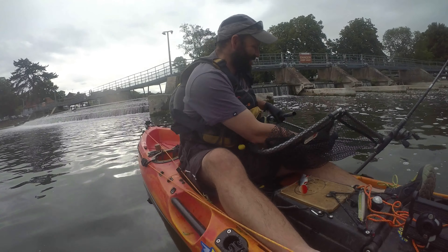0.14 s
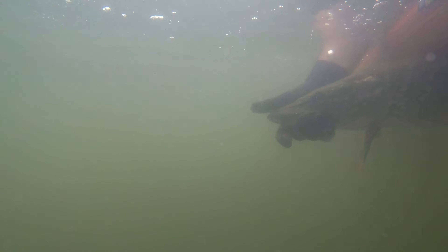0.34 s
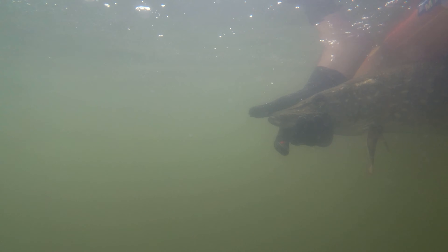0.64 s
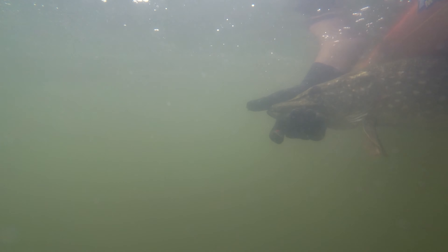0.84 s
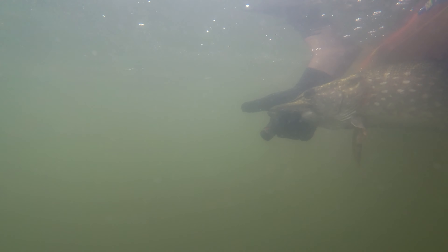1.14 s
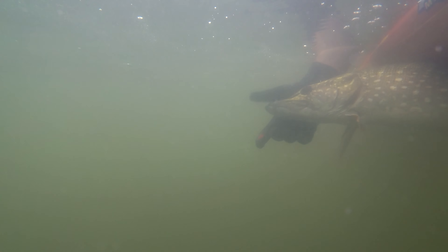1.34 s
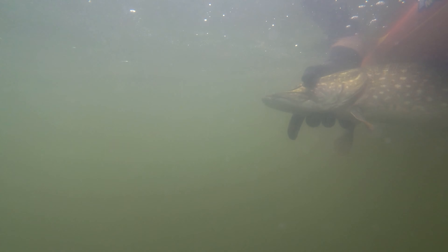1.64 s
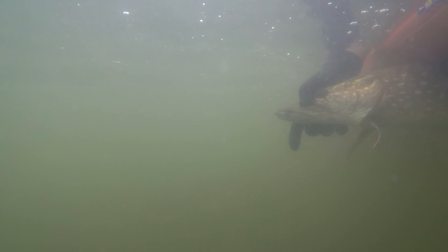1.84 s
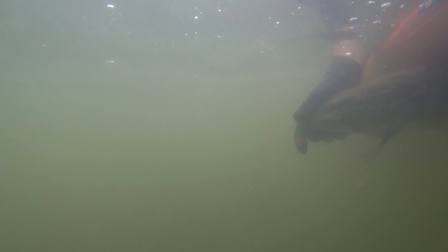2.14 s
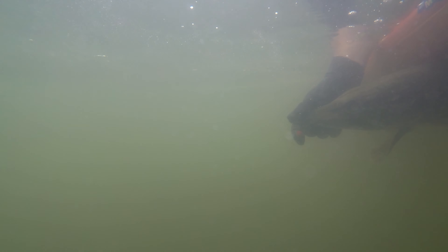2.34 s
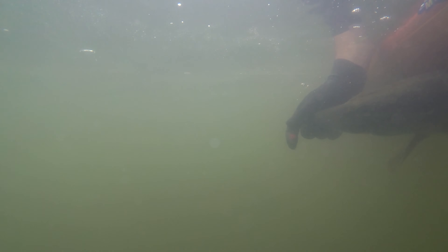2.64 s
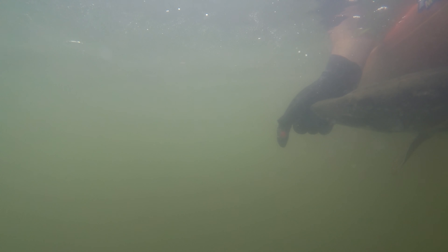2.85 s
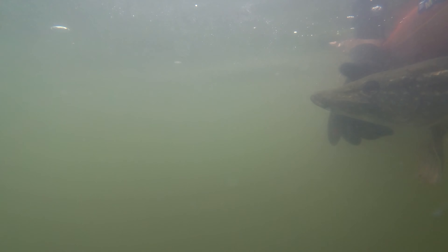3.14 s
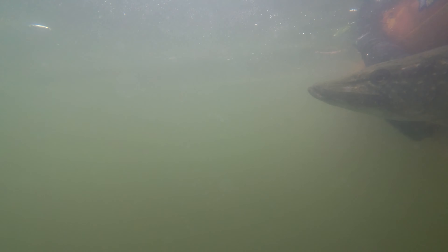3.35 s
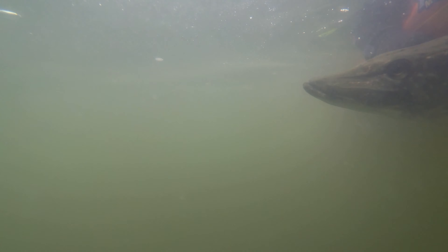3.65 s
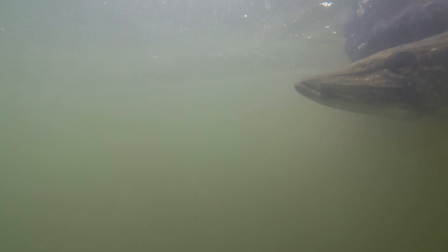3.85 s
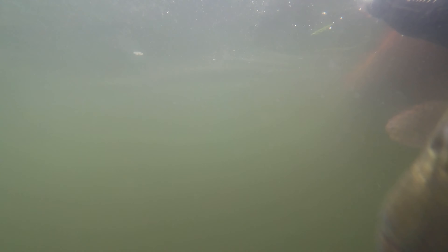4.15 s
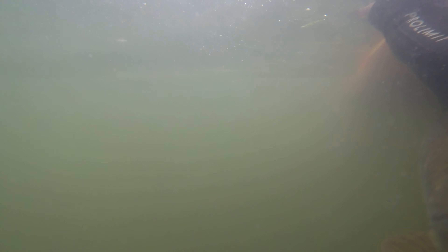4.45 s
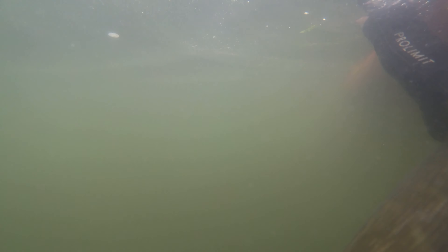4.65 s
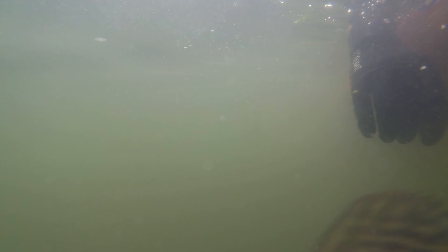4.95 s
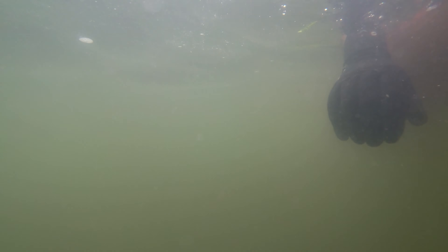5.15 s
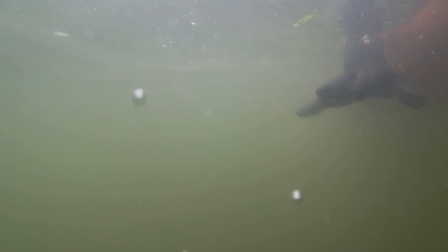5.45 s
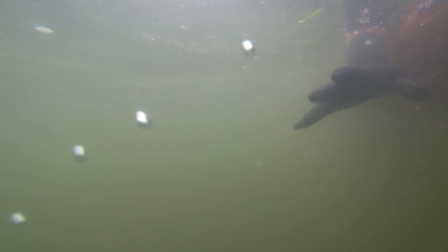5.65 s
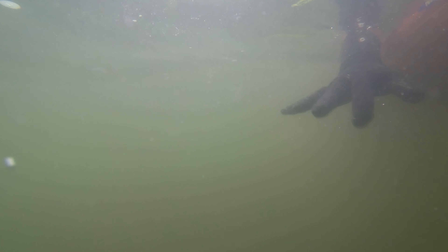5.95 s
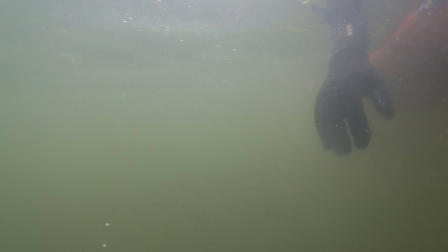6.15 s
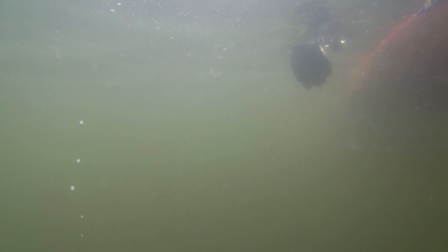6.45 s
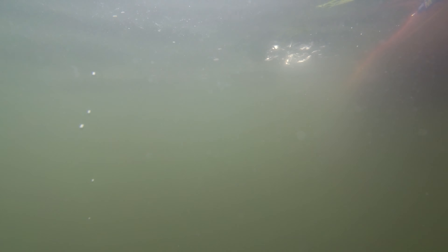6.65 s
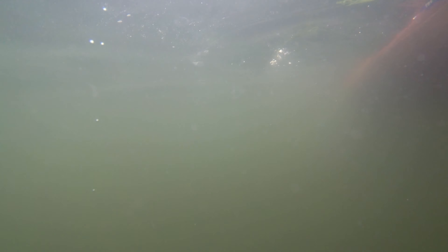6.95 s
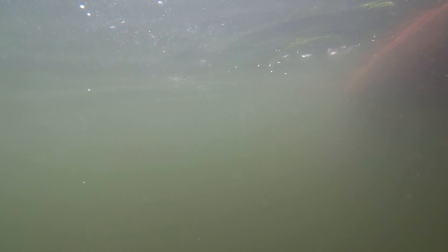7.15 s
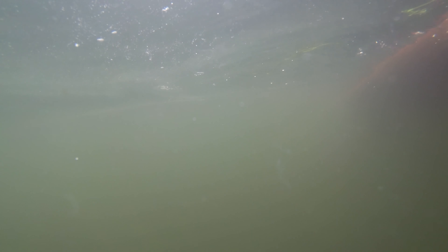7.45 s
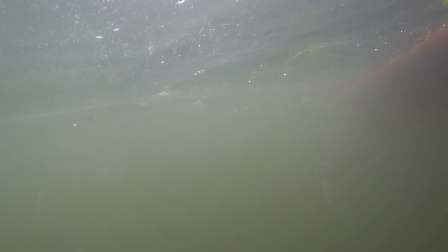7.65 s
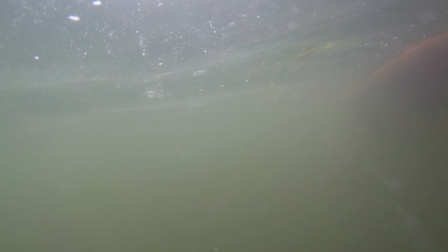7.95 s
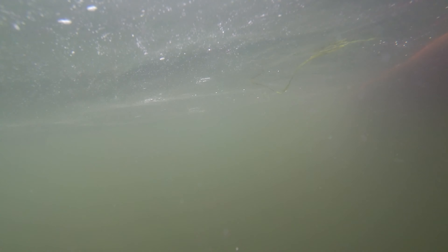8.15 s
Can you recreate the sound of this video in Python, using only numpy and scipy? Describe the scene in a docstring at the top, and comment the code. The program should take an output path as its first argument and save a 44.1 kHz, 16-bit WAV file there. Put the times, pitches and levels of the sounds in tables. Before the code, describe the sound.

Beside a kayak, falling water at a weir roars in open air for a third of a second, then cuts to a submerged, muffled rumble and hollow hum. Deep thumps come irregularly, with bubbles and gulps. A pike's release brings hard, overloaded knocks in the middle, then a loud gulp, sloshing and fewer thuds. The microphone is sealed in a waterproof housing.

```python
"""Pike let go below a weir

From a kayak on the river: the weir through the air for a moment, then the camera's waterproof housing is under.
Shaped noise makes the roar of the weir, and narrow resonances of noise make its hum in the housing.
At the housing, strokes of fin and hand set off decaying tones: deep thumps, dull knocks, gulps and bubbles.
Stirred water is low noise with a swarm of small rings; drops and grit tick.
The hardest blows overload the microphone and are cut flat; a faint thin high buzz follows the low swings."""
import sys
import numpy as np
from scipy import signal
from scipy.fft import rfft, irfft
from scipy.io import wavfile
from scipy.ndimage import uniform_filter1d

SR = 44100
rng = np.random.default_rng(int(sys.argv[2]) if len(sys.argv) > 2 else 0)


def file_out(sig):
    """Save sig as 16-bit WAV at sys.argv[1]."""
    # one column per channel
    cols = np.atleast_2d(sig).T
    # limit, then scale
    lim = np.clip(cols, -1, 1)
    pcm = np.round(lim * 32767).astype(np.int16)
    wavfile.write(sys.argv[1], SR, pcm)


N = 365456
TIME = np.arange(N) / SR  # s

# spectrum of the weir through the air: f/Hz, relative density/dB
AIR = [(15, -72), (25, -22), (64, -6), (103, 1.5), (146, -8.5), (243, -5.5), (373, -5), (427, -7),
       (501, -5), (749, -10), (3010, -31.5), (4040, -28.5), (8100, -51.5), (9270, -40.5), (15000, -77)]
# resonances of the microphone port in air: f/Hz, filter width/Hz, rms level/dB
PORT = [(3970, 410, -48), (9200, 800, -67)]
# spectrum of the weir's rumble through the housing: f/Hz, relative density/dB
RIVER = [(15, -16), (30, -6), (62, -1.5), (95, -6.5), (220, -11.5), (330, -8.5), (450, -6.5), (560, -9),
         (680, -14.5), (770, -24.5), (1070, -25), (1170, -44), (1880, -49), (2150, -78)]
# spectrum of the faint hiss under water: f/Hz, relative density/dB
HISS = [(1000, 0.5), (2200, -3), (3000, -8), (4600, -4), (8000, -9), (12300, -14), (13000, -30)]
# air resonances of the housing: f/Hz, filter width/Hz, relative level/dB
HOUSING = [(510, 42, -34.5), (551, 29, -37), (665.1, 28, -46.5), (1044.6, 47, -56), (1286, 60, -70.5)]
# strength of the current, lifting hum and rumble together: t/s, gain/dB
CURRENT = [(0.3, -0.5), (2.0, -0.55), (3.6, -0.7), (4.3, 0), (6.4, 0), (7.1, 2), (8.29, 2.66)]
# small sharp ticks of drops and grit on the housing:
# t/s, ring level/dB, f/Hz, ring t60/s, click level before it is rounded off/dB
TICKS = [(1.358, -56, 1865, 0.055, -60.5), (4.596, -67, 4750, 0.013, -44), (4.835, -19, 1057, 0.051, -31),
         (4.836, -24.5, 1625, 0.011, -41), (4.991, -54, 4700, .015, -69), (5.364, -37, 1020, 0.02, -32),
         (6.212, -57.5, 4700, 0.014, -37), (6.291, -26, 970, 0.018, -22), (7.36, -29, 1267, 0.048, -58),
         (8.167, -46, 1750, .02, -49.5)]
# strokes of fish and hand that stir the water: start t/s, hold/s, slosh level/dB, bubbling level/dB
STIRS = [(1.322, 0.24, -30.5, -33), (3.54, 0.034, -30.5, -29.5), (3.981, 0.39, -32, -35.5),
         (4.317, 0.036, -17.5, -29.5), (4.704, 0.29, -26.5, -49.5), (5.33, 0.017, -27, -25.5),
         (6.713, 0.37, -18.5, -36), (7.05, 0.05, -17, -28.5), (7.2, 0.29, -27, -34.5)]
# spectrum of low eddies sloshing on the housing: f/Hz, relative density/dB
SLOSH = [(15, -15.5), (35, -5.5), (62, 9.5), (90, -7), (145, -10), (178, -7.5), (205, -14),
         (320, -23), (600, -44), (1500, -87.5)]
# single bubbles that ring as they close: t/s, level before dulling/dB, starting f/Hz, t60/s
BUBBLES = [(0.453, -17.5, 505, 0.034), (0.489, -19, 479, 0.29), (0.572, -15, 520, 0.036),
           (0.622, -27.5, 890, 0.031), (1.39, -15.5, 606, 0.021), (1.423, -22.5, 833, 0.032),
           (1.424, -37.5, 1053, 0.39), (1.492, -11, 552, 0.2), (1.566, -15.5, 623, 0.021),
           (1.569, -27, 921, 0.089), (1.596, -17, 669, 0.063), (1.783, -18.5, 623, 0.13),
           (3.362, -34.5, 1040, 0.05), (4.018, -20.5, 608, 0.078), (4.05, -16.5, 564, 0.066),
           (4.086, -16, 525, 0.084), (4.213, -19.5, 516, 0.16), (4.594, -15.5, 547, 0.027),
           (4.83, -12.5, 490, 0.042), (5.355, -12, 620, 0.011), (5.36, -2.5, 497, 0.097),
           (5.385, -12.5, 546, 0.15), (6.291, -10.5, 586, 0.018), (6.72, -13.5, 567, 0.071),
           (6.86, -12.5, 610, 0.072), (7.335, -26, 1051, 0.25), (7.359, -20.5, 767, 0.03),
           (7.359, -22.5, 562, 0.14), (7.41, -27, 821, 0.09), (7.555, -16.5, 425, 0.064)]
# big gulps of air: t/s, level before dulling/dB, starting f/Hz, t60/s
GULPS = [(1.335, -16.5, 427, 0.24), (1.397, -15.5, 343, 0.43), (5.357, -5, 374, 0.14)]
# dull knocks of water on the hull and housing: t/s, level of the main ring/dB, starting f/Hz, t60/s
KNOCKS = [(1.332, -19, 214, 0.05), (3.5816, -0.5, 240.3, 0.065), (3.603, -8.5, 172, 0.084),
          (3.822, -11, 103.5, 0.12), (4.264, -7, 256, 0.067), (4.379, -2, 245.3, 0.056),
          (4.414, -11.5, 361, 0.054), (4.669, -22, 128, 0.085), (4.91, -9, 256.3, 0.075),
          (5.314, -6.5, 254, 0.04), (5.318, -8.5, 112.4, 0.056), (6.717, -14.5, 193, 0.078),
          (7.011, -17, 192, 0.23), (7.104, -6.5, 354, 0.012), (7.161, -18, 256, 0.03)]
# pressure surges: t/s, level before overload/dB, f/Hz, rise/s, t60/s
THUMPS = [(0.455, -20.5, 50.7, 0.012, 0.33), (0.66, -3, 53.8, 0.029, 0.21), (1.02, 3, 53.7, 0.018, 0.23),
          (1.227, -2, 54.7, 0.03, 0.2), (1.555, -14.5, 45, 0.046, 0.18), (1.804, -7.5, 52.5, 0.036, 0.22),
          (2.108, -15, 44.3, 0.048, 0.18), (3.045, -13.5, 47.7, 0.014, 0.24), (3.352, 0, 51.3, 0.027, 0.23),
          (3.518, -12.5, 55, 0.019, 0.39), (3.599, 4, 47.2, 0.017, 0.13), (3.684, -18, 56.8, 0.046, 0.4),
          (3.829, -0.4, 50.8, 0.037, 0.22), (3.981, -14, 57.5, 0.025, 0.23), (4.092, -14, 50.5, 0.029, 0.5),
          (4.407, 3, 51.06, 0.015, 0.25), (4.668, -4.5, 52, 0.013, 0.11), (4.939, -2.5, 51.5, 0.03, 0.09),
          (5.022, -10.5, 53.7, 0.018, 0.14), (5.118, -1.5, 50.8, 0.015, 0.13),
          (5.297, -6, 45, 0.025, 0.093), (5.583, -5, 50.5, 0.016, 0.26), (5.744, -16.5, 44, 0.035, 0.15),
          (6.061, -14, 47, 0.024, 0.15), (6.192, -22, 48.3, 0.038, 0.25), (6.811, -17.5, 60.5, 0.017, 0.21),
          (7.121, -4, 47.2, 0.02, 0.12), (7.311, -9, 52, 0.017, 0.12), (7.444, -13.5, 51, 0.014, 0.15),
          (7.916, -14.5, 58.5, 0.019, 0.17)]

DIVE_S, DIVE_FADE_S = 0.3103, 0.0018  # the camera goes under
AIR_DB = -29
# the hum swells and sinks slowly
SWELL_DB, SWELL_PERIOD_S, SWELL_CREST_S = 0.5, 1.8, 2.35
STIR_ATTACK_S, SLOSH_FALL_DB_PER_S, BUBBLING_FALL_DB_PER_S = 0.029, 109.5, 172
# a small bubble swells for a few cycles and rises a little in pitch
BUBBLE_RISE_CYCLES, BUBBLE_GLIDE_OCTAVES = 1.6, 0.05
# a big pocket of air swells for a few cycles, drops quickly in pitch and has a weak overtone
GULP_RISE_CYCLES, GULP_DROP_OCTAVES, GULP_SETTLE_S, GULP_OVERTONE_DB = 2.2, 0.94, 0.028, -14.5
AIR_POCKET_TOP_HZ = 1300  # the housing dulls gulps and bubbles above this
KNOCK_RISE_CYCLES = 2
# a surge swings the camera on its mount; the quicker the surge, the harder its first jolt
JOLT_DB, JOLT_AT_RISE_S, JOLT_DB_PER_HALVING = -14.5, 0.02, 5
BUZZ_HZ, BUZZ_DB = 3900, -61  # spacing and strength of the sample-rate conversion images
TOP_HZ = 15900  # upper limit of the recorder


def undb(db):
    """Decibels to gain."""
    return 10 ** (np.asarray(db) / 20)


def unit(x):
    """Scale to rms 1."""
    return x / np.sqrt(np.mean(x ** 2) + 1e-18)


def add(track, s, sound):
    """Mix a sound into the track at time s."""
    i = max(int(s * SR), 0)
    track[i:i + len(sound)] += sound[:max(N - i, 0)]


def colour(x, points):
    """Give a sound a spectrum of (Hz, dB) points, at rms 1."""
    hz, db = np.transpose(points)
    f = np.maximum(np.fft.rfftfreq(N, 1 / SR), 1)
    gain = undb(np.interp(np.log(f), np.log(hz), db))
    return unit(irfft(rfft(x) * gain, N))


def resonate(x, hz, width_hz):
    """A steep resonance: one band-pass applied twice."""
    b, a = signal.iirpeak(hz, hz / width_hz, fs=SR)
    return signal.lfilter(b, a, signal.lfilter(b, a, x))


def muffle(x, hz, order):
    """Low-pass."""
    return signal.sosfilt(signal.butter(order, hz, fs=SR, output="sos"), x)


def noise():
    """White noise."""
    return rng.standard_normal(N)


def walk(rate):
    """Random levels held 1 / rate s and slewed twice; spread near 1."""
    k = int(SR / rate)
    steps = np.repeat(rng.standard_normal(N // k + 1), k)
    return 1.27 * uniform_filter1d(uniform_filter1d(steps, k), k)[:N]


def ring(hz, rise, t60, glide=0, settle_s=None):
    """A resonance that swells while it is pushed, then dies away; its pitch glides by some octaves."""
    rise = max(rise, 1 / SR)
    t = np.arange(int((rise + 2 * t60) * SR)) / SR
    swell = np.sin(np.pi / 2 * np.minimum(t / rise, 1)) ** 2
    fade = np.exp(-np.log(1000) * np.maximum(t - rise, 0) / t60)
    pitch = hz * 2 ** (glide * np.tanh(t / (settle_s or t60 / 2)))
    return swell * fade * np.sin(2 * np.pi * np.cumsum(pitch) / SR)


def weir_in_air():
    """Falling water roars as broad noise, with narrow resonances of the microphone port on top."""
    port = sum(undb(db) * unit(resonate(noise(), hz, width)) for hz, width, db in PORT)
    return undb(AIR_DB) * colour(noise(), AIR) + port


def river(rumble_db=-28.5, waver_db=2.0, hiss_db=-80.5, hum_db=1.0, hum_waver_db=2):
    """The roar of the weir rumbles through the housing and keeps its air resonances humming."""
    flow_db = np.interp(TIME, *np.transpose(CURRENT))
    swell_db = SWELL_DB * np.cos(2 * np.pi * (TIME - SWELL_CREST_S) / SWELL_PERIOD_S)
    rumble = colour(noise(), RIVER) * undb(rumble_db + waver_db * walk(15))
    hum = np.zeros(N)
    for hz, width, db in HOUSING:
        waver = undb(db + hum_waver_db * walk(16))
        hum += waver * unit(resonate(noise(), hz, width))
    hum *= undb(hum_db + swell_db)
    hiss = undb(hiss_db) * colour(noise(), HISS)
    return (rumble + hum) * undb(flow_db) + hiss


def ticks():
    """Drops and grit strike the housing: a short ring and a click that the housing rounds off."""
    rings, clicks = np.zeros(N), np.zeros(N)
    for s, ring_db, hz, t60, click_db in TICKS:
        add(rings, s, undb(ring_db) * ring(hz, 0.002, t60))
        add(clicks, s, undb(click_db) * ring(920, 0.00023, 0.0033))
    return rings + muffle(clicks, 1900, order=10)


def stroke(start, hold, fall_db_per_s):
    """Gain of one stroke: it builds up, holds, then settles."""
    t = TIME - start
    build = np.clip(t / STIR_ATTACK_S, 0, 1)
    return build * undb(-fall_db_per_s * np.maximum(t - STIR_ATTACK_S - hold, 0))


def churn(count=1100, scatter_db=8, housing_db=8):
    """Stirred water: low eddies slosh on the housing and a swarm of small bubbles rings."""
    slosh_power, bubbling_power = np.zeros(N), np.zeros(N)
    for s, hold, slosh_db, bubbling_db in STIRS:
        slosh_power += (undb(slosh_db) * stroke(s, hold, SLOSH_FALL_DB_PER_S)) ** 2
        bubbling_power += (undb(bubbling_db) * stroke(s, hold, BUBBLING_FALL_DB_PER_S)) ** 2
    slosh = colour(noise(), SLOSH) * np.sqrt(slosh_power)
    swarm = np.zeros(N)
    for when, size, strength, damping in rng.random((count, 4)):
        # small bubbles (size near 1) are higher, shorter and weaker
        hz = 280 * 3.8 ** size
        t60 = (8 + 20 * damping) / hz
        level = undb(scatter_db * strength - 10 * size)
        add(swarm, when * N / SR, level * ring(hz, 0.0027, t60, glide=0.06))
    swarm = muffle(swarm, 1080, order=12)
    # the smallest bubbles wake the housing's upper resonance
    swarm = swarm + undb(housing_db) * resonate(swarm, 1055, 70)
    return slosh + unit(swarm) * np.sqrt(bubbling_power)


def bubbles():
    """Small pockets of air ring as they close, rising a little in pitch, dulled by the housing."""
    out = np.zeros(N)
    for s, db, hz, t60 in BUBBLES:
        add(out, s, undb(db) * ring(hz, BUBBLE_RISE_CYCLES / hz, t60, BUBBLE_GLIDE_OCTAVES))
    return muffle(out, AIR_POCKET_TOP_HZ, order=4)


def gulps():
    """Big pockets of air drop quickly in pitch, with a weak octave overtone, dulled by the housing."""
    out = np.zeros(N)
    for s, db, hz, t60 in GULPS:
        rise = GULP_RISE_CYCLES / hz
        for multiple, partial_db in [(1, 0.0019), (2, GULP_OVERTONE_DB)]:
            partial = ring(multiple * hz, rise, t60, -GULP_DROP_OCTAVES, GULP_SETTLE_S)
            add(out, s, undb(db + partial_db) * partial)
    return muffle(out, AIR_POCKET_TOP_HZ, order=4)


def knocks(body_db=-12, wall_db=-16, overtone_db=-14):
    """A slap rings at a sinking pitch and an overtone, over a low push and a brief answer of the housing."""
    out = np.zeros(N)
    for s, db, hz, t60 in KNOCKS:
        slap, rise = undb(db), KNOCK_RISE_CYCLES / hz
        add(out, s, slap * ring(hz, rise, t60, glide=-0.15))
        add(out, s, slap * undb(overtone_db) * ring(1.6 * hz, rise, 3.9 * t60))
        add(out, s, slap * undb(body_db) * ring(125, 2 * rise, 0.07))
        add(out, s, slap * undb(wall_db) * ring(570, rise / 2, 0.028))
    return out


def thumps(jolt_hz=102, jolt_rise=0.0045, jolt_t60=0.14):
    """Each surge rocks the camera and flexes its mount about an octave higher, harder if abrupt."""
    out = np.zeros(N)
    for s, db, hz, rise, t60 in THUMPS:
        jolt_db = db + JOLT_DB + JOLT_DB_PER_HALVING * np.log2(JOLT_AT_RISE_S / rise)
        add(out, s, undb(db) * ring(hz, rise, t60))
        add(out, s + 0.003, undb(jolt_db) * ring(jolt_hz, jolt_rise, jolt_t60))
    return out


def scene():
    """A moment in the open air, then everything under water."""
    under = np.clip((TIME - DIVE_S) / DIVE_FADE_S, 0, 1)
    water = river() + ticks() + churn() + bubbles() + gulps() + knocks() + thumps()
    return ((1 - under) * weir_in_air() + under * water)[None]


def record(dry):
    """Overload cuts the loudest swings flat; sample-rate conversion leaves a thin buzz; the top is cut off."""
    clipped = np.clip(dry, -1, 1)
    # conversion images: faint copies of the sound around each multiple of BUZZ_HZ,
    # heard as a thin high buzz that follows the loud low swings
    images = sum(undb(BUZZ_DB) / k * np.cos(2 * np.pi * k * BUZZ_HZ * TIME) for k in range(1, 5))
    top_cut = signal.ellip(8, 0.2, 70, TOP_HZ, fs=SR, output="sos")
    return signal.sosfilt(top_cut, clipped * (1 + images))


dry = scene()
out = record(dry)
file_out(out)
```